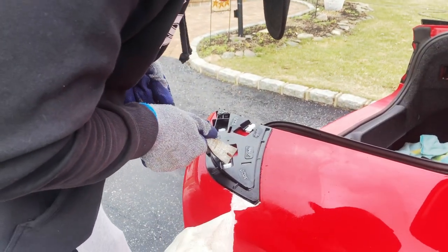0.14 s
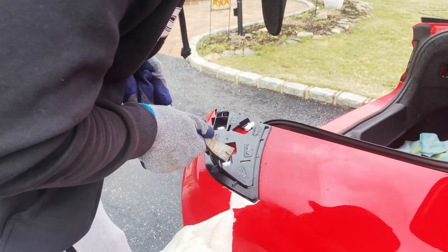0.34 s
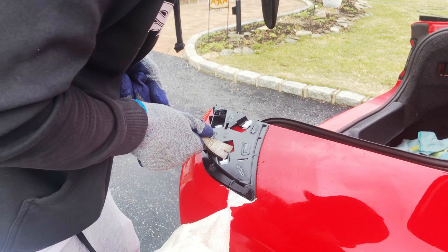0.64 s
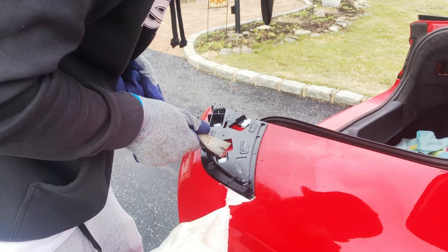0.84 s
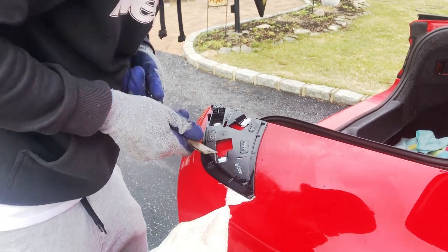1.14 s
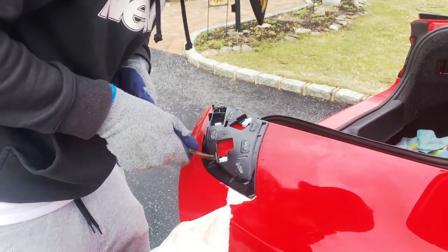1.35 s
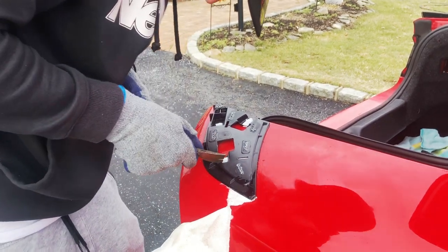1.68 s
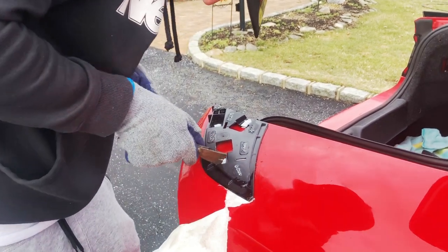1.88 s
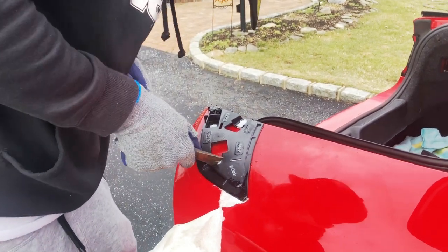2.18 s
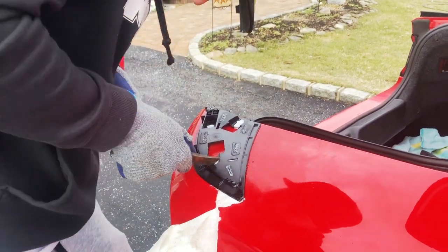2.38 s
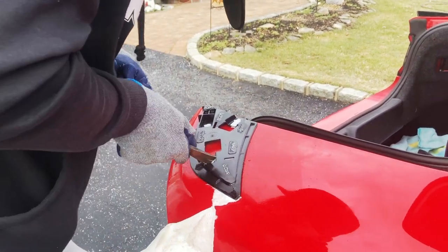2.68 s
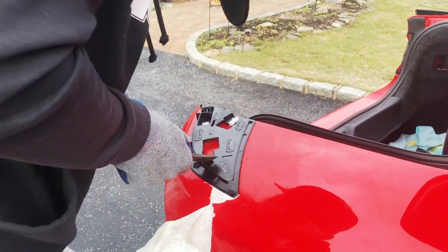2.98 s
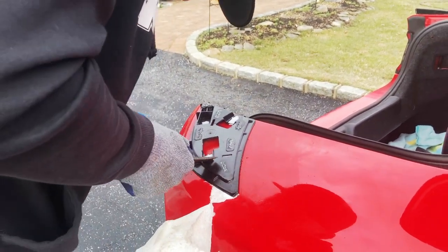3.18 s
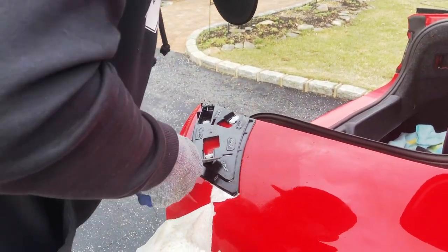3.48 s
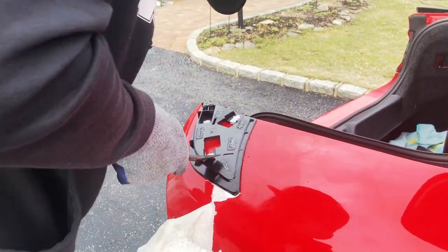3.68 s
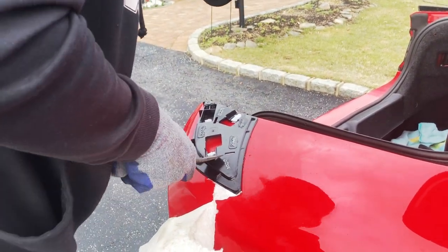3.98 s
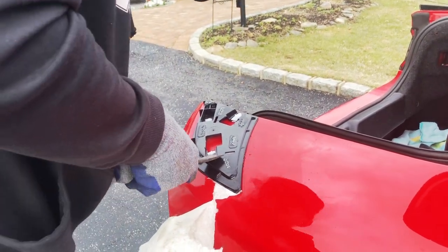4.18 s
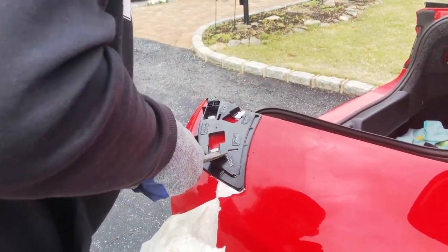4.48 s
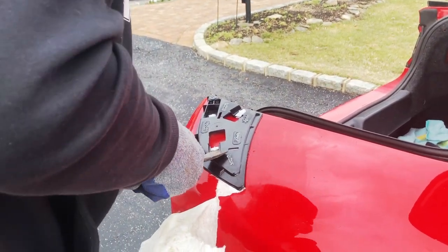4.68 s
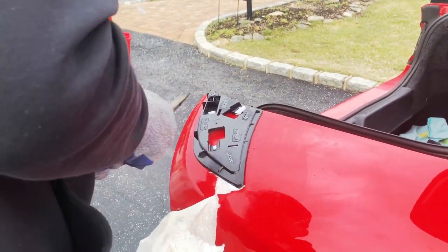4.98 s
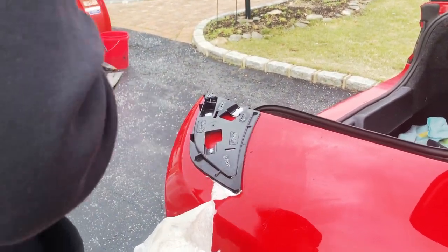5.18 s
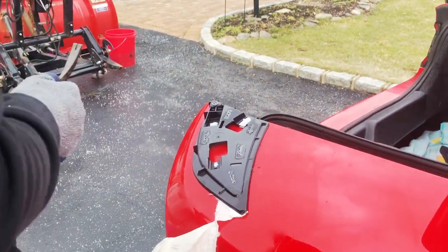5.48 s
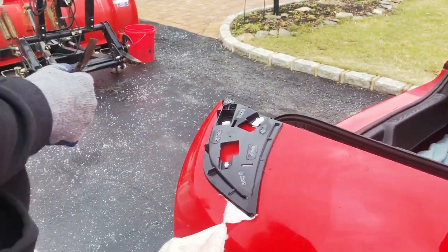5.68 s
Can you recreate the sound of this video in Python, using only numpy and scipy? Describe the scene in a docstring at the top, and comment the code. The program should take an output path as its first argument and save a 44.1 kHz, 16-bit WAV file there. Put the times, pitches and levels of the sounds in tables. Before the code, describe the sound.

Plastic clips crack one at a time as a hand tool pries trim from a car door near the microphone. The loosened trim knocks on the door, making it thump and ring briefly, with quiet cloth rubbing and metal ticks in between. Near the end a final loud snap sets the whole panel rattling. Behind it all are faint bird chirps and the low hum of far roads, heard from a driveway.

```python
"""A hum of distant traffic and small twittering birds, heard from a driveway. Close to the microphone
a hand tool levers plastic trim off a car door: clips crack, plastic and steel blade ring, and the
hollow door thumps and rings as the trim knocks on it. Glove, sleeve and blade scuff in between.
The last clip squeaks, lets go and shakes the whole panel; the hum dips there and creeps back."""
import sys
import numpy as np
from scipy import signal
from scipy.fft import rfft, irfft, next_fast_len
from scipy.io import wavfile
from scipy.ndimage import uniform_filter1d, map_coordinates

SR = 44100
rng = np.random.default_rng(int(sys.argv[2]) if len(sys.argv) > 2 else 0)


def generate_wav(signal):
    """Clip the signal to [-1, 1] and save it as 16-bit WAV at the path in sys.argv[1]."""
    frames = np.transpose(np.atleast_2d(signal))
    scaled = np.clip(frames, -1, 1) * 32767
    pcm = np.round(scaled).astype(np.int16)
    wavfile.write(sys.argv[1], SR, pcm)


N = 257676

# spectra of the far roads, the rubbing cloth and the chattering trim: frequency_hz, level_db
TRAFFIC_SPECTRUM = [(20, -43.5), (35, -19), (64, -3), (110, -0.5), (180, -3), (293, -11.5), (591, -12),
                    (887, -11), (1600, -20.5), (2300, -35.5), (3800, -40), (5500, -42), (7500, -53.5),
                    (16000, -67)]
CLOTH_SPECTRUM = [(200, -2), (900, 7), (1350, 6), (1700, 4), (2300, 6.5), (3200, 4), (4200, 3), (6000, 2),
                  (10000, -2), (15000, -1)]
RATTLE_SPECTRUM = [(71, -24.5), (120, -5), (222, -18.5), (605, -15), (656, -13), (1340, -20), (1900, -22),
                   (2290, -28.5), (2930, -25), (3380, -29), (16000, -43)]
# bird calls, note by note: offset_s, length_s, start_hz, middle_hz, end_hz
TWITTER_NOTES = [(0, 0.042, 3610, 5740, 4470), (.066, .034, 4080, 3925, 5000),
                 (.104, .038, 3520, 4860, 3700)]
UPSLUR_NOTES = [(0, .029, 6250, 7350, 7850)]
DOWNSLUR_NOTES = [(0.0026, .06, 5100, 3950, 3100)]
WHISTLE_NOTES = [(0, 0.11, 3400, 3700, 4400)]
WARBLE_NOTES = [(0, 0.065, 3160, 3320, 3770), (.043, .082, 3500, 4340, 3480),
                (.073, .073, 3100, 3330, 4300)]
# when each call is sung: start_s, level_db
TWITTER_TIMES = [(0.199, -76), (0.758, -66.5), (1.724, -72.5), (3.027, -68), (3.673, -59), (5.003, -66)]
UPSLUR_TIMES = [(0.972, -74), (1.163, -63), (2.085, -69), (3.209, -71)]
DOWNSLUR_TIMES = [(3.145, -66), (3.44, -81), (3.791, -65), (3.954, -71)]
WHISTLE_TIMES = [(0, -75.5), (1.06, -66), (2.675, -67.5), (3.219, -70), (4.678, -73), (5.76, -72)]
WARBLE_TIMES = [(2.984, -58)]
# strokes of glove, sleeve and blade: start_s, length_s, level_db, tilt_db_per_octave
SCUFF_STROKES = [(0.443, 0.13, -61.5, -1.5), (1.001, 0.46, -69, -2.5), (2.145, 0.18, -68.5, -1.5),
                 (2.36, 0.064, -50.5, -3), (2.39, 0.42, -65, -1), (3.092, .11, -68, -1),
                 (3.528, 0.3, -60, -3), (3.886, 0.13, -58.5, -3), (4.224, 0.12, -60, -2),
                 (4.372, 0.2, -60, -3.5), (4.526, .22, -56, -2.5), (4.998, .12, -66, -3),
                 (5.194, 0.11, -55.5, -1.5), (5.479, 0.098, -63, -0.5), (5.723, 0.053, -53.5, 0.5)]
# modes of the trimmed door, the steel blade and the plastic clips: pitch_hz, level_db, t60_s
DOOR_MODES = [(68.3, -5.5, 0.35), (179.4, 3.5, 0.28), (212, 3.5, 0.21), (283.5, -5, 0.26),
              (314.6, 1.5, 0.17), (351.4, -2.5, 0.22), (403, -6.5, 0.3), (476, -2.5, 0.14),
              (566, -15.5, 0.13), (658, -6, 0.18), (816, -5.5, 0.24), (860, -14, 0.33), (816, 1.5, 0.052),
              (946, 0.5, 0.1), (1086, -1, 0.081), (1274, -5, 0.074), (1490, -16.5, .14), (1650, -6, .11),
              (1710, -15.5, 0.064), (2010, -7.5, .08), (2840, -12.5, .08)]
BLADE_MODES = [(1112, -1.5, 0.26), (2900, -8, 0.063), (4900, -5.5, 0.06), (7300, -4, 0.042),
               (10800, -16.5, 0.067), (15500, -25.5, 0.047)]
CLIP_MODES = [(1297, -11, 0.062), (1334, -20.5, 0.2), (1620, 0, 0.023), (1750, -14, 0.013),
              (2052, -7.5, 0.038), (2390, -18, 0.063), (3080, -1.5, 0.019), (3114, 0.5, 0.0089),
              (3750, -7.5, .015), (5130, -28, 0.016), (6330, -23.5, .016)]
# the low, middle and high bands of a crack: frequency_hz, level_db
BODY_SPECTRUM = [(250, -11), (600, -3), (950, -4.5), (1350, -8), (2050, -7.5), (2500, -23.5), (4000, -67)]
BITE_SPECTRUM = [(1400, -62), (2000, -13), (2300, 0), (2600, -3.5), (3100, -2.5), (4200, -4.5), (5000, -4),
                 (6200, -7.5), (7200, -32), (9000, -69.5)]
FIZZ_SPECTRUM = [(4500, -70), (6000, -20), (6900, -1), (8500, 0), (10000, -5), (13000, -4), (15700, 0)]
# the trim knocking on the door: start_s, swing_db, pitch_hz, contact_db
TRIM_KNOCKS = [(0.3122, -38.5, 201, -54), (0.562, -24, 192.5, -44), (1.667, -34, 428, -42),
               (1.69, -35, 383, -74), (1.969, -36, 198, -57), (2.973, -17.5, 183.6, -48.5),
               (3.899, -42, 300, -49), (4.262, -41.5, 575, -63.5), (4.806, -30.5, 249, -58),
               (4.814, -22, 68.8, -39.5), (4.817, -29, 496, -37), (5.211, -49, 420, -54)]
# the blade ticking on the trim: start_s, level_db, bright_db, decay_s
BLADE_TICKS = [(0.293, -60, 0.5, .025), (0.4915, -46.5, 5, 0.0049), (2.2129, -56.5, 1, 0.011),
               (2.9076, -45.5, 11, 0.002), (3.6951, -43.5, -4, 0.0034), (3.8539, -44.5, -0.5, 0.0097),
               (4.1313, -56, -1, 0.06), (4.7928, -43, 8.5, 0.0055), (5.1702, -55, -5, 0.08),
               (5.7309, -57.5, 7, 0.023)]
# clips cracking under the lever: start_s, level_db, bright_db, decay_s, plastic_db, steel_db, lag_s
CLIP_CRACKS = [(0.5147, -20.5, 1, .0055, 0, -27, .0012), (1.6627, -42, -4, .015, -12, -3, .0043),
               (1.9708, -29.5, -3, .006, -3, -25, .002), (2.9706, -37.5, 2, .014, -6, -22, .0084),
               (4.8148, -21.5, 8, .011, -17, -20, .0018)]


def amp(db):
    """Decibels to gain."""
    return 10 ** (np.asarray(db) / 20)


def unit(x):
    """Scale to rms 1."""
    return x / np.sqrt(np.mean(x ** 2) + 1e-20)


def clock(seconds):
    """Sample times over a duration."""
    return np.arange(max(int(seconds * SR), 8)) / SR


def filtered(x, response):
    """Filter x by a gain given as a function of frequency."""
    size = next_fast_len(len(x) + 2048)
    return irfft(rfft(x, size) * response(np.fft.rfftfreq(size, 1 / SR)), size)[:len(x)]


def coloured(x, spectrum, tilt_db=0):
    """Shape x by a spectrum and a tilt per octave above 500 Hz, at rms 1."""
    points_hz, points_db = np.transpose(spectrum)

    def response(hz):
        shape_db = np.interp(np.log(hz + 1), np.log(points_hz + 1), points_db)
        return amp(shape_db + tilt_db * np.log2(np.maximum(hz, 500) / 500))
    return unit(filtered(x, response))


def wobble(rate_hz):
    """A smooth random curve through rate_hz knots a second."""
    knots = rng.standard_normal(int(N * rate_hz / SR) + 4)
    coarse = np.arange(0, N, 32)
    return np.interp(np.arange(N), coarse, map_coordinates(knots, [coarse * rate_hz / SR]))


def grains(size, rate_hz, spread_db):
    """Tiny random contacts of uneven strength, at rms 1."""
    strength = amp(spread_db * rng.uniform(-1, 1, size))
    hits = rng.random(size) < rate_hz / SR
    return unit(hits * np.sign(rng.standard_normal(size)) * strength)


def add(track, start_s, sound):
    """Mix a sound into the track at start_s."""
    part = track[max(round(start_s * SR), 0):][:len(sound)]
    part += sound[:len(part)]


def microphone_hiss():
    """The microphone's own faint noise."""
    return amp(-84) * rng.standard_normal(N)


def traffic():
    """Far roads hum over a slowly rolling drone; the level dips at the last clip and recovers."""
    dip_start_s, fall_s, depth_db, recover_db_per_s = 4.8, .12, 14, 10.5
    hum = coloured(rng.standard_normal(N), TRAFFIC_SPECTRUM) * amp(0.78 * wobble(3.4))
    drone = coloured(rng.standard_normal(N), [(45, -41), (76, 4.5), (115, -41.5), (400, -100)])
    drone *= amp(0.84 * wobble(0.97))
    since_s = np.arange(N) / SR - dip_start_s
    dip_db = np.clip(since_s / fall_s, 0, 1) * np.maximum(depth_db - recover_db_per_s * since_s, 0)
    return amp(-50.5 - dip_db) * (amp(-1) * hum + amp(-12) * drone)


def bird_note(length_s, start_hz, middle_hz, end_hz):
    """One whistle gliding through three pitches with a slight quaver."""
    t = clock(length_s)
    progress = t / t[-1]
    glide_hz = np.polyval(np.polyfit([0, .5, 1], [start_hz, middle_hz, end_hz], 2), progress)
    quaver = 1 + .02 * np.sin(2 * np.pi * (38 * t + rng.random()))
    phase = 2 * np.pi * np.cumsum(glide_hz * quaver) / SR + np.cumsum(rng.normal(0, .04, len(t)))
    return np.abs(np.sin(np.pi * progress)) ** .6 * np.sin(phase)


def birds():
    """Birds repeat their calls; the fainter, the farther off, with more echo from houses and trees."""
    pitch_spread, tempo_spread = .015, .08  # no two calls are quite alike
    near_bird_db, echo_t60_s = -56.5, .42
    direct, scattered = np.zeros(N), np.zeros(N)
    calls = [(TWITTER_NOTES, TWITTER_TIMES), (UPSLUR_NOTES, UPSLUR_TIMES),
             (DOWNSLUR_NOTES, DOWNSLUR_TIMES), (WHISTLE_NOTES, WHISTLE_TIMES),
             (WARBLE_NOTES, WARBLE_TIMES)]
    for notes, times in calls:
        for start_s, level_db in times:
            detune, stretch = 1 + rng.uniform(-0.92, 1, 2) * [pitch_spread, tempo_spread]
            echo_db = -5 + 0.32 * (near_bird_db - level_db)
            for offset_s, length_s, *pitches_hz in notes:
                note = amp(level_db) * bird_note(length_s * stretch, *(detune * np.array(pitches_hz)))
                add(direct, start_s + offset_s * stretch, note)
                add(scattered, start_s + offset_s * stretch, note * amp(echo_db))
    scattered *= wobble(700)  # scattering blurs each note into a narrow band
    t = clock(0.63)
    tail = rng.standard_normal(len(t)) * amp(-60 * t / echo_t60_s) * (1 - np.exp(-t / .008))
    echo = signal.fftconvolve(scattered, tail / np.linalg.norm(tail))[:N]
    return direct * amp(2 * wobble(150)) + echo


def scuffs():
    """Close rubbing is a swell of tiny slips over soft hiss; the sleeve never quite stops stirring."""
    stirring = coloured(grains(N, rate_hz=150, spread_db=9), CLOTH_SPECTRUM)
    out = amp(-86) * stirring * amp(3 * wobble(7))
    for start_s, length_s, level_db, tilt_db in SCUFF_STROKES:
        t = clock(length_s)
        slips = .8 * grains(len(t), rate_hz=550, spread_db=12) + .55 * rng.standard_normal(len(t))
        swell = np.abs(np.sin(np.pi * t / t[-1])) ** .8
        add(out, start_s, amp(level_db) * swell * coloured(slips, CLOTH_SPECTRUM, tilt_db))
    # each slip catches a different spot, so its colour keeps changing
    spectra = signal.stft(out * amp(1.6 * wobble(70)), nperseg=256)[2]
    spots = uniform_filter1d(rng.standard_normal(spectra.shape), size=6, axis=0)
    spots = unit(uniform_filter1d(spots, size=7, axis=1))
    return signal.istft(spectra * amp(3 * spots), nperseg=256)[1][:N]


def clip_squeak():
    """The last clip squeals as it slides out; uneven stick and slip blurs the pitch."""
    t, pitch_hz = clock(.019), 3065
    slipping = np.cumsum(rng.normal(0, 0.099, len(t)))
    rise = amp(-60 + 20 * t / t[-1])
    out = np.zeros(N)
    add(out, 4.796, rise * np.sin(2 * np.pi * pitch_hz * t + slipping))
    return out


def trim_rattle():
    """The freed trim chatters against the door, hardest at the panel's widest swing."""
    t, widest_s, t60_s = clock(.2), .026, 0.37
    chatter = coloured(grains(len(t), rate_hz=4400, spread_db=5.5), RATTLE_SPECTRUM, tilt_db=-1.5)
    shake = amp(-29) * np.exp(-np.abs(t - widest_s) / 0.014)
    settling = amp(-36.5 - 60 * t / t60_s)
    out = np.zeros(N)
    add(out, 4.817, chatter * (shake + settling))
    return out


def door_thumps():
    """The knocked panel swings a few cycles, then rings on, favouring the modes near that pitch."""
    panel_hz = 178.8  # the panel's main swing
    out, t = np.zeros(N), clock(0.36)
    mode_hz, mode_db, t60_s = np.transpose(DOOR_MODES)[:, :, None]
    build_up = 1 - np.exp(-t * mode_hz / 0.65)  # low modes build up slowly
    for start_s, swing_db, pitch_hz, _ in TRIM_KNOCKS:
        peak_s = 0.013 * (panel_hz / pitch_hz) ** 0.74  # higher swings peak sooner
        swell = (t / peak_s) ** 2
        swing = swell * np.exp(1 - swell) * np.sin(2 * np.pi * pitch_hz * t)
        reach_db = -5.5 * np.abs(np.log2(mode_hz / pitch_hz)) + rng.normal(0, 1.5, mode_hz.shape)
        tones = np.sin(2 * np.pi * mode_hz * t + rng.normal(0, 1, mode_hz.shape))
        ring = np.sum(amp(mode_db + reach_db - 60 * t / t60_s) * tones * build_up, axis=0)
        ring_db = -11 + 3 * np.log2(pitch_hz / panel_hz)  # higher swings leave more ring
        add(out, start_s, amp(swing_db) * (swing + amp(ring_db) * ring))
    return out


def ringing(modes, t):
    """Damped modes, struck at slightly new strengths each time."""
    pitch_hz, level_db, t60_s = np.transpose(modes)[:, :, None]
    fade = amp(level_db + rng.normal(0, 0.69, pitch_hz.shape) - 60 * t / t60_s)
    return np.sum(fade * np.sin(2 * np.pi * (pitch_hz * t + rng.random(pitch_hz.shape))), axis=0)


def crack(level_db, bright_db, decay_s, plastic_db=-8, steel_db=-22.5):
    """Plastic cracks and rings with the blade; the door cavity keeps a faint, darker tail."""
    t = clock(.16)
    attack = 1 - np.exp(-t / .0003)
    sound = amp(plastic_db) * ringing(CLIP_MODES, t) + amp(steel_db) * ringing(BLADE_MODES, t)
    # brightness trades body for fizz
    for spectrum, band_db, t60_s, tail_db, tail_t60_s in [
            (BODY_SPECTRUM, -2 - bright_db, 1.3 * decay_s, -15, .11),
            (BITE_SPECTRUM, 3, .95 * decay_s, -22, .075),
            (FIZZ_SPECTRUM, 3 + bright_db, .8 * decay_s, -29, .06)]:
        fade = amp(-60 * t / t60_s) + amp(tail_db - 60 * t / tail_t60_s)
        sound += amp(band_db) * fade * coloured(rng.standard_normal(len(t)), spectrum)
    return amp(level_db) * sound * attack


def levering():
    """Clips give way in two quick catches, the blade ticks, and each knock starts with a dull click."""
    out = np.zeros(N)
    for start_s, level_db, bright_db, decay_s, plastic_db, steel_db, lag_s in CLIP_CRACKS:
        add(out, start_s, crack(level_db, bright_db, decay_s, plastic_db, steel_db))
        second_catch = crack(level_db - 9.5, bright_db - 2.5, 0.96 * decay_s)  # weaker and duller
        add(out, start_s + lag_s, second_catch)
    for start_s, level_db, bright_db, decay_s in BLADE_TICKS:
        add(out, start_s, crack(level_db, bright_db, decay_s))
    for start_s, _, _, contact_db in TRIM_KNOCKS:
        add(out, start_s, crack(contact_db, bright_db=-14.5, decay_s=0.0094, plastic_db=1.5))
    return out


def scene():
    """One microphone in the driveway, close to the door, with birds and roads farther off."""
    close = levering() + door_thumps() + clip_squeak() + trim_rattle() + scuffs()
    return (close + birds() + traffic() + microphone_hiss())[None]


def record(dry):
    """The recorder cuts off steeply above its band limit."""
    top_hz = 16200
    return np.array([filtered(x, lambda hz: 1 / np.sqrt(1 + (hz / top_hz) ** 160)) for x in dry])


dry = scene()
out = record(dry)
generate_wav(out)
```